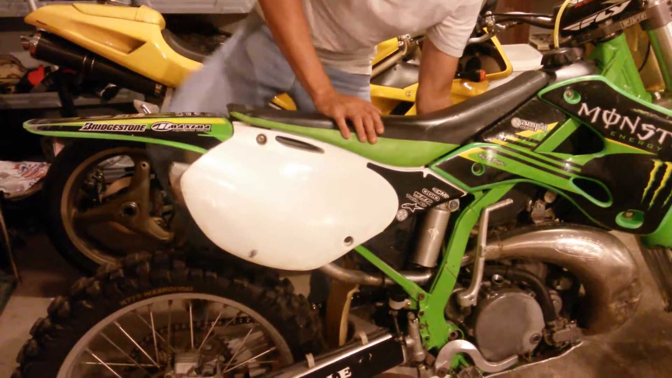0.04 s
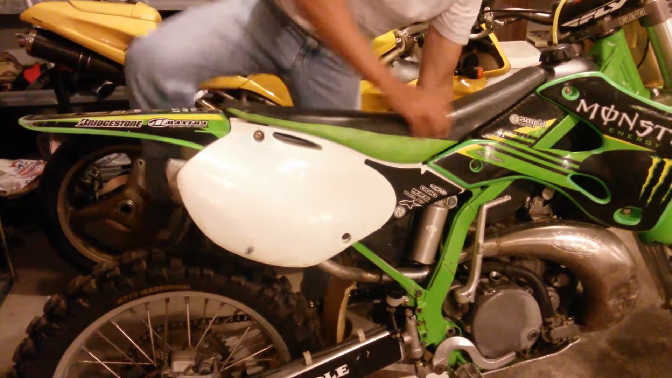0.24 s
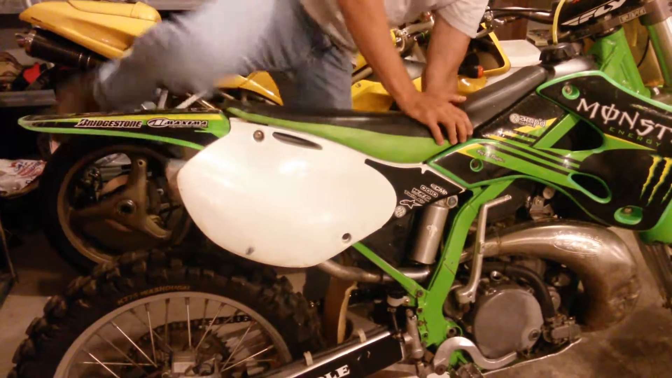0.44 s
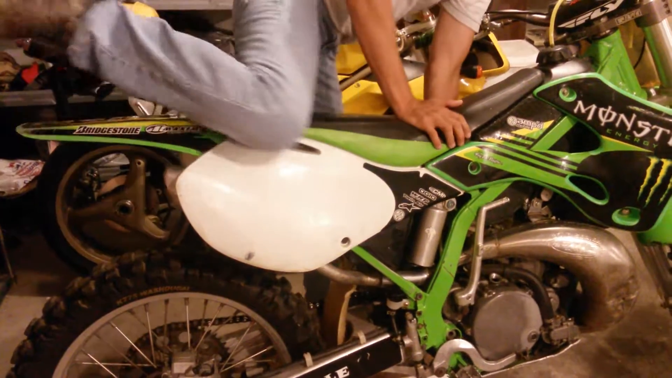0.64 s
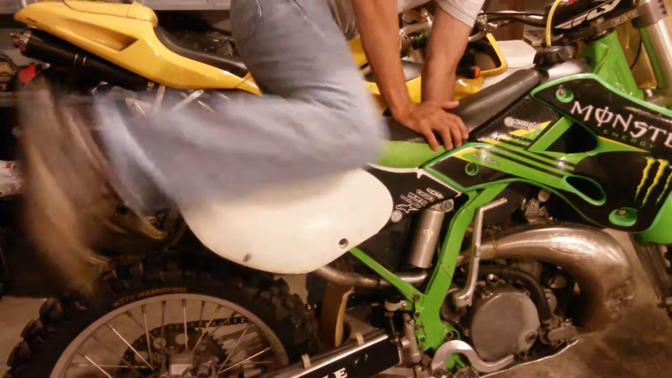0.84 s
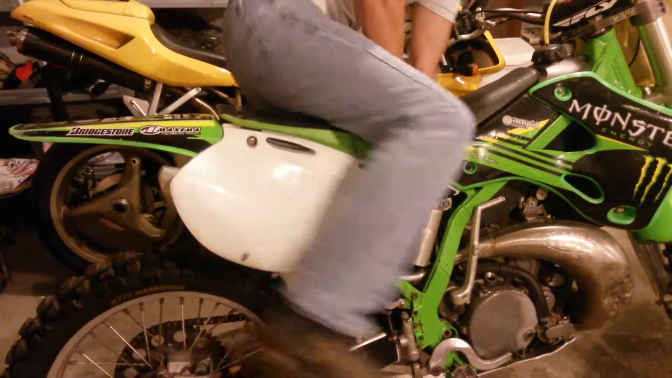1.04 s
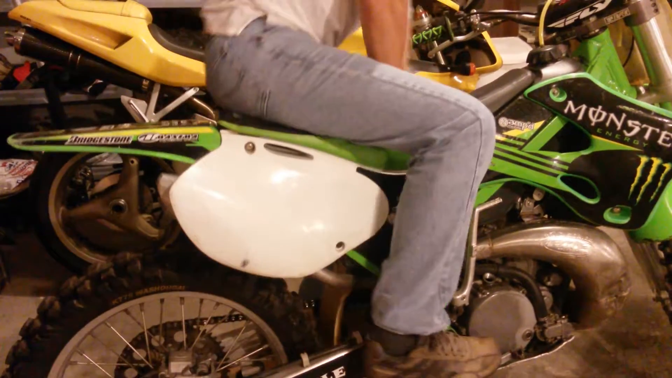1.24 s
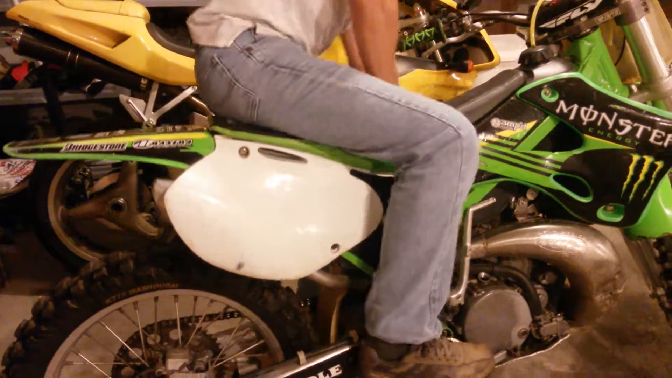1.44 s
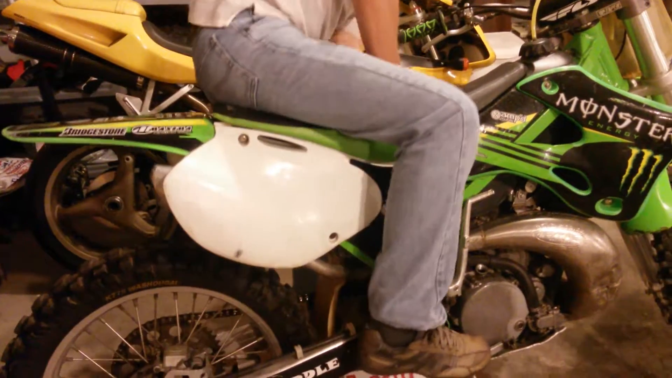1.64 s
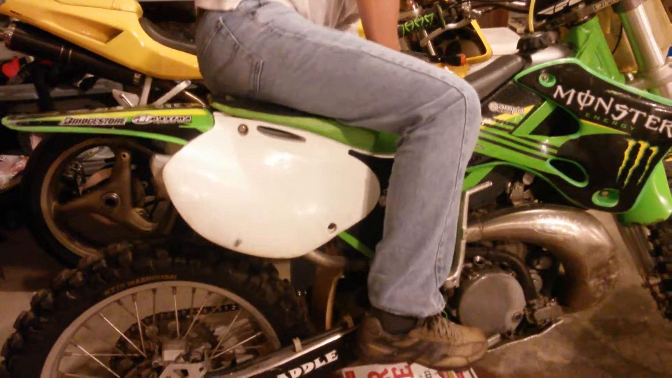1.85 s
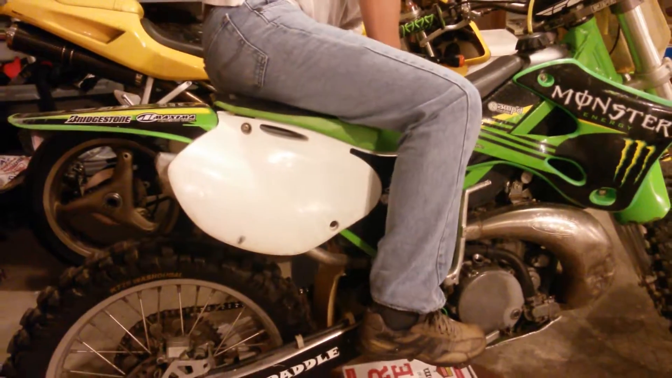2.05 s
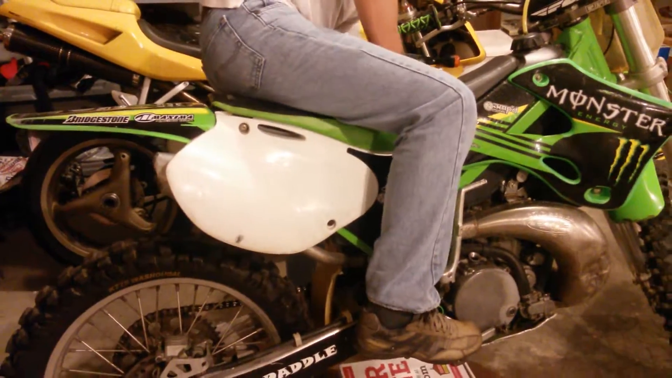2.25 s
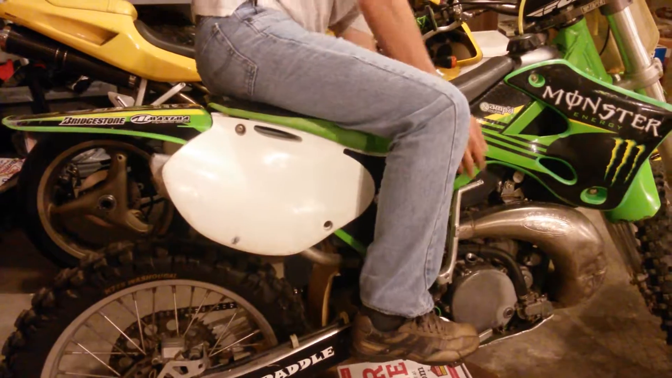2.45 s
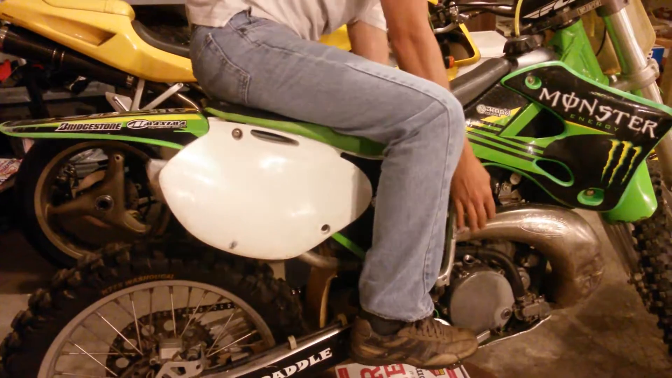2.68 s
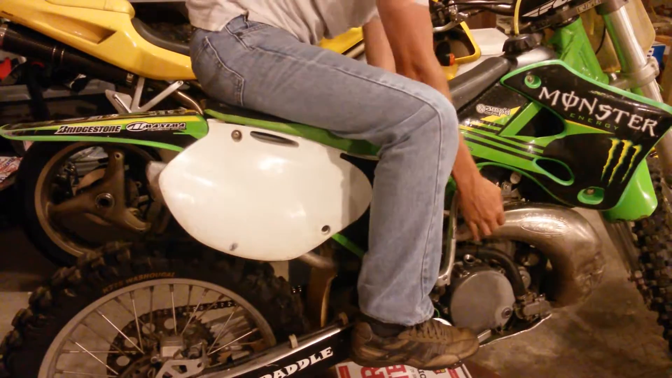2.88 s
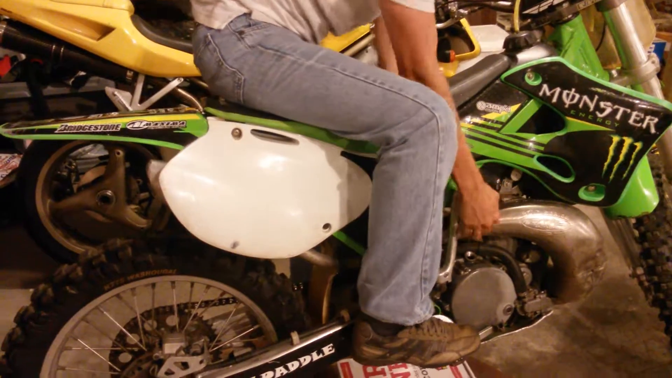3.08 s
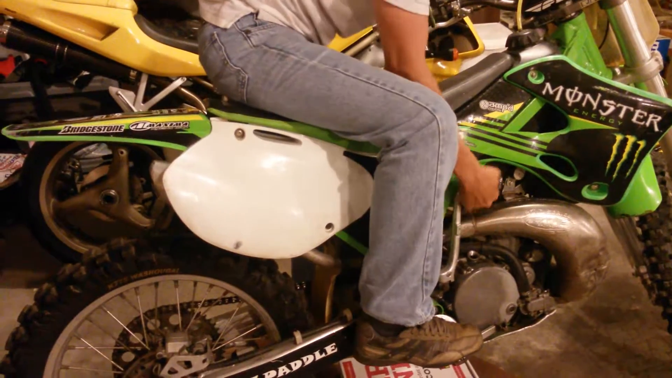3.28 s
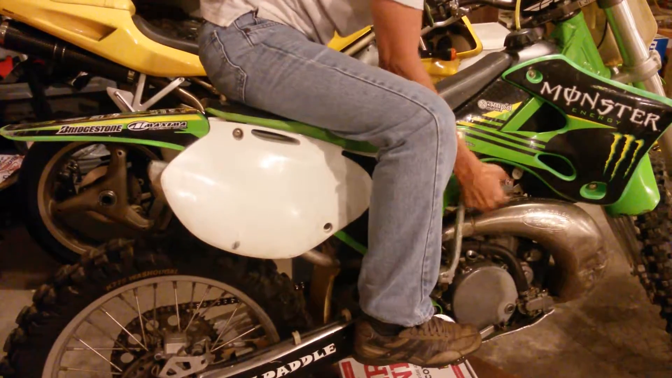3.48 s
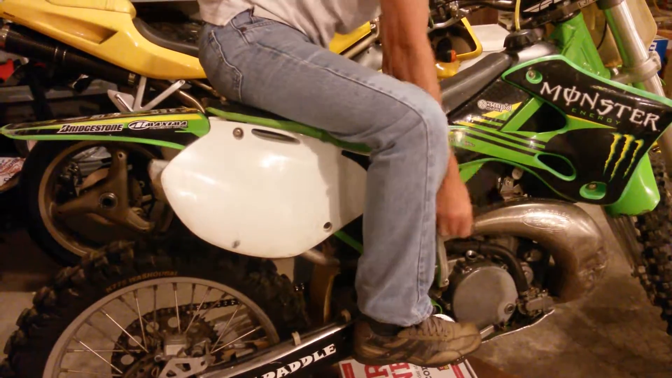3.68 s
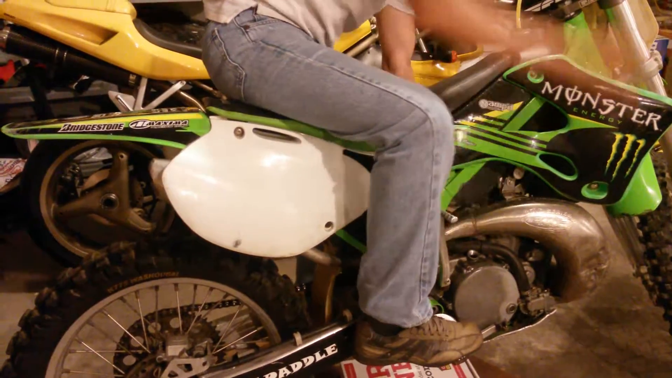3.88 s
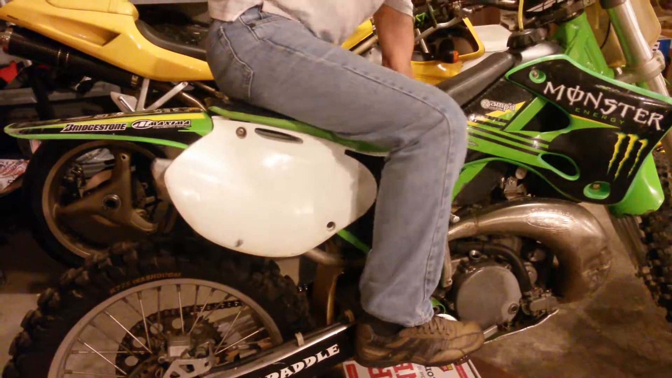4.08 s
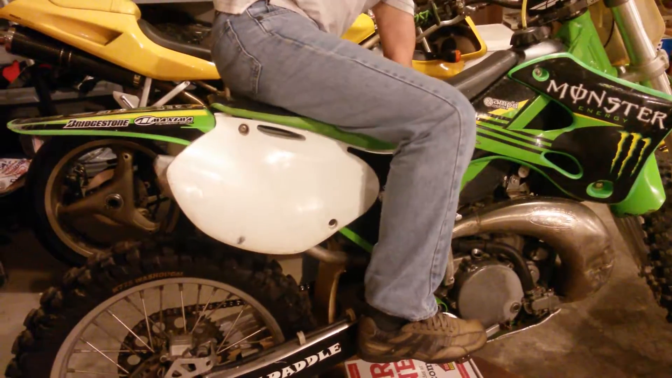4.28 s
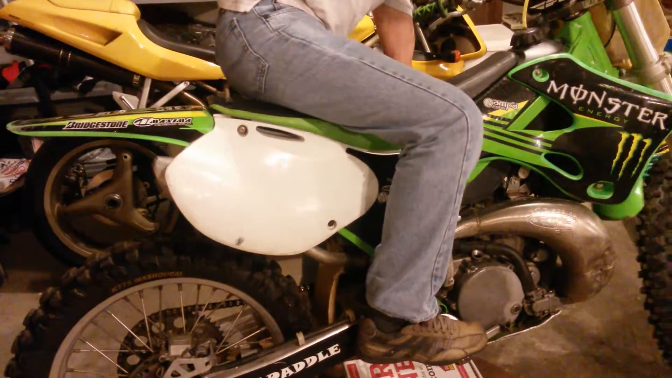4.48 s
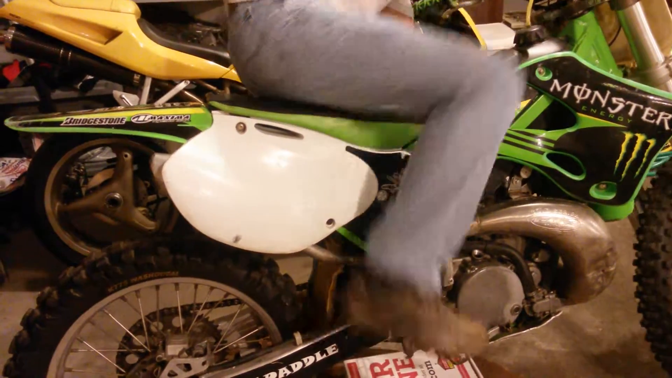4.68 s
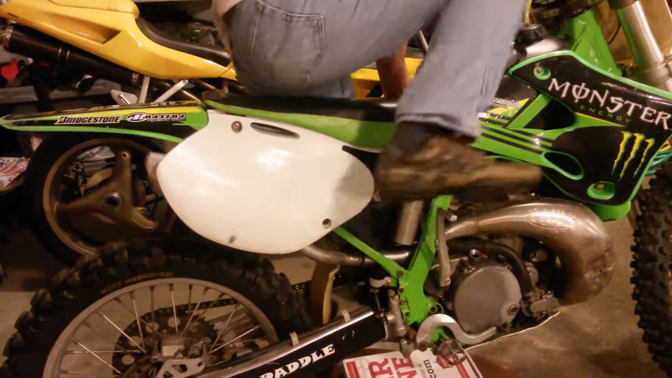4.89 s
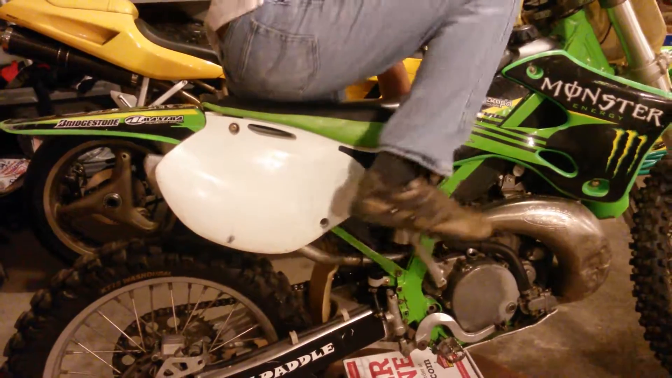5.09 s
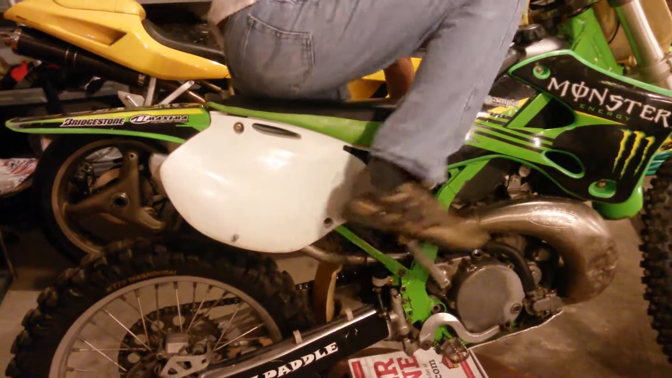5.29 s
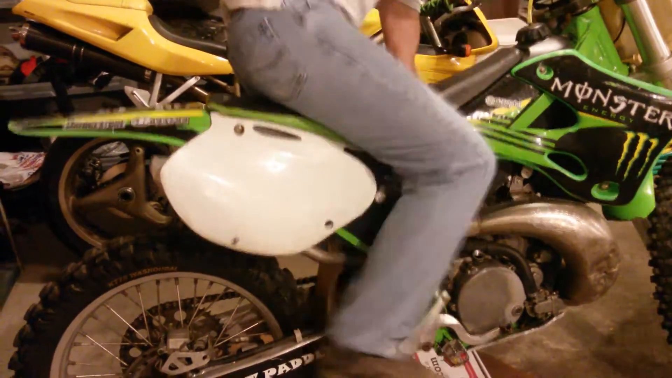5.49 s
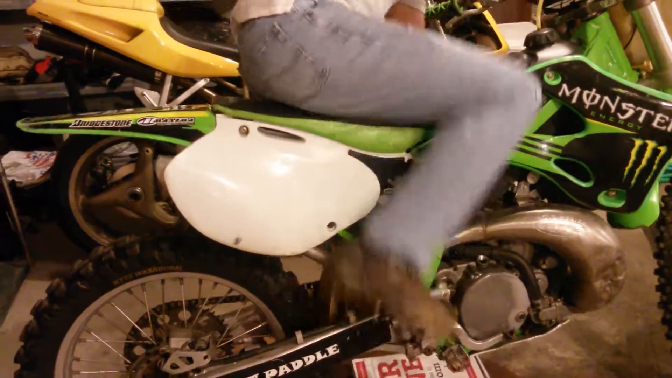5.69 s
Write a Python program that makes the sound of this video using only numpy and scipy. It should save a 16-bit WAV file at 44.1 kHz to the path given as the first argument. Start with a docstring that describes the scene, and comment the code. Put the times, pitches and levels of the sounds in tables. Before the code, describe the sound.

Soft clothing rubs, clicks and thuds on a dirt bike, ending in a single ratcheting kick-start stroke without the engine firing.

```python
"""Kicking a dirt bike in a small garage.

A rider climbs on, folds out the kick lever and stamps on it. Denim and rubber rustle as grainy
noise; boots, plastics and metal tick and thud as noise bursts through the bike's resonances, and
the seat or tank groans. The kick drives ratchet, gears, piston and pipe into a loud clatter, and
a metal part rings on at the end. Hard walls echo the bike over still air and humming lights."""
import sys
import numpy as np
from scipy import signal
from scipy.fft import rfft, irfft
from scipy.io import wavfile
from scipy.ndimage import uniform_filter1d

SR = 44100
rng = np.random.default_rng(int(sys.argv[2]) if len(sys.argv) > 2 else 0)


def transcribe(signal):
    """Save signal, clipped to [-1, 1], as a 16-bit WAV file at the path in sys.argv[1]."""
    frames = np.atleast_2d(signal).T
    limited = np.clip(frames, -1, 1)
    pcm = np.round(limited * 32767).astype(np.int16)
    wavfile.write(sys.argv[1], SR, pcm)


N = 252693
T = np.arange(N) / SR


def undb(db):
    return 10 ** (np.asarray(db) / 20)


def unit_rms(x):
    return x / np.sqrt(np.mean(x ** 2))


def wander(rate_hz):
    """Random levels joined by ramps; spread of order 1."""
    step = int(SR / rate_hz)
    return 1.72 * uniform_filter1d(np.repeat(rng.standard_normal(N // step + 1), step), step)[:N]


def panned(x, left_db):
    return x * undb([[left_db / 2], [-left_db / 2]])


def stereo_noise(alike):
    """White noise; left and right are equal at alike = 1."""
    mid, side = rng.standard_normal((2, N))
    return alike * mid + np.sqrt(1 - alike ** 2) * side * np.array([[1], [-1]])


def resonate(x, modes):
    """Steep resonances whose powers add; causal, and keeps the level of white noise."""
    n = 8192
    f = np.maximum(np.fft.rfftfreq(n, 1 / SR), 1)
    power = 0
    for hz, width_hz, db in modes:
        detune = (f / hz - hz / f) * hz / max(1.714 * width_hz, 20)
        power = power + undb(2 * db) / (1 + detune ** 2) ** 2
    cepstrum = irfft(np.log(power / power.mean()) / 2, n)
    cepstrum[1:n // 2] *= 2  # fold to minimum phase
    cepstrum[n // 2 + 1:] = 0
    response = irfft(np.exp(rfft(cepstrum)), n)[None, :n // 2]
    return signal.oaconvolve(x, response, axes=1)[:, :N]


def bursts(starts_s, levels_db, decays_ms, left_db, base_rise, alike):
    """Noise pushes that die exponentially; longer ones start more softly."""
    envelope = np.zeros(N)
    for start, db, decay_ms in np.broadcast(starts_s, levels_db, decays_ms):
        span = slice(int(start * SR), int((start + 0.15) * SR))
        age = np.maximum(T[span] - start, 0) * 1000 / decay_ms
        rise = base_rise + 0.038 * decay_ms  # share of the decay time
        envelope[span] += undb(db) * np.exp(-age) * (1 - np.exp(-age / rise))
    return panned(envelope, left_db) * stereo_noise(alike)


# Background spectrum. Each row: frequency in Hz, relative density in dB.
AIR_SPECTRUM = [(20, 4), (35, -8), (60, -16.5), (120, -12), (300, -16.5), (700, -21.5), (1500, -26),
                (4000, -28.5), (7800, -23), (11000, -29), (15000, -28)]
# Hum of the lights. Each row: frequency in Hz, level in dB.
LIGHT_HUM = [(60, -90), (120, -82), (601, -85)]


def air():
    """Still air, microphone hiss and the hum of the lights."""
    hz, density_db = np.transpose(AIR_SPECTRUM)
    f = np.maximum(np.fft.rfftfreq(N, 1 / SR), 1)
    spectrum = undb(np.interp(np.log(f), np.log(hz), density_db))
    mid, side = irfft(rfft(rng.standard_normal((2, N))) * spectrum, N)
    side = signal.sosfilt(signal.butter(1, 380, "high", fs=SR, output="sos"), side)
    noise = unit_rms(mid + 0.91 * side * np.array([[1], [-1]]))
    hum = sum(undb(db) * np.sin(2 * np.pi * pitch * T) for pitch, db in LIGHT_HUM)
    return noise * undb(-68.5 + 0.14 * wander(2.6)) + hum


# The rider's movements. Each row: time of full level, swell and hold in seconds,
# then treble, mid and bass levels in dB.
RUBS = [(0.086, 0.21, 0.16, -60.5, -71, -74.5), (0.322, 0.14, 0.12, -56.5, -67.5, -70),
        (0.512, 0.03, 0.13, -49, -55, -50.5), (0.775, 0.044, 0.1, -53, -53.5, -64),
        (1.18, 0.25, 0.15, -56, -66.5, -60.5), (1.25, 0.031, 0.17, -47, -54.5, -55),
        (1.665, 0.5, 0.034, -47, -60, -60), (1.87, 0.066, 0.016, -56, -69, -67),
        (2.008, 0.088, 0.071, -58, -76, -73), (2.969, 0.043, 0.025, -65, -72, -73),
        (3.134, 0.097, 0.028, -48.5, -58, -65.5), (3.394, 1, 0.25, -69, -74, -80.5),
        (3.738, 0.31, 0.096, -66.5, -66, -60.5), (4.201, 0.12, 0.093, -62.5, -66.5, -65),
        (4.412, 0.26, 0.17, -66.5, -74.5, -71.5), (4.658, 0.044, 0.05, -49, -56, -61.5),
        (4.767, 0.1, 0.14, -40.5, -53.5, -60.5), (5.021, 0.052, 0.034, -49, -50, -47),
        (5.133, 0.13, 0.066, -47.5, -59, -57)]


def rub_gains(swell_db=19, fade_db_per_s=130):
    """Treble, mid and bass gains of denim and rubber rubbing: each stroke swells, holds, fades."""
    power = 0
    for full_s, swell_s, hold_s, *bands_db in RUBS:
        rise_db = np.minimum(swell_db * (T - full_s) / swell_s, 0)
        fall_db = fade_db_per_s * np.maximum(T - full_s - hold_s, 0)
        power = power + undb(2 * (np.array(bands_db)[:, None] + rise_db - fall_db))
    return np.sqrt(power)


# Resonances, shared with thuds and ticks. Each row: centre in Hz, nominal width in Hz, weight in dB.
TREBLE_MODES = [(5530, 4740, -1), (7605, 1680, 11.5), (10800, 3700, -38.5)]  # bright colour near the microphone's peak
METAL_MODES = [(1450, 1100, 2.5), (2115, 500, 5), (2780, 1530, 3)]  # lever and frame
BODY_MODES = [(103, 66, -5.5), (246, 132, 4), (305, 157, 4), (480, 110, 4), (640, 350, -1.5), (816, 180, 0),
              (1110, 720, -3)]  # bike body and pipe


def friction(treble_gain, mid_gain, bass_gain):
    """Rubbing and whirring: dense, uneven, flickering grains excite three sets of resonances."""
    def grains(alike, left_db, flicker_db):
        size = undb(1.82 * rng.exponential(size=N) + flicker_db * wander(40))
        return unit_rms(panned(size * stereo_noise(alike), left_db))
    hiss = resonate(grains(alike=0.68, left_db=0.24, flicker_db=1.97), TREBLE_MODES)
    scrape = resonate(grains(alike=0.68, left_db=4.8, flicker_db=2.65), METAL_MODES)
    body = resonate(grains(alike=0.96, left_db=0.17, flicker_db=2.56), BODY_MODES)
    return hiss * treble_gain + scrape * mid_gain + body * bass_gain


# Blows on seat, tank and floor, and puffs of the pipe. Each row: start in seconds, level in dB,
# upper-mode offset in dB, favoured pitch in Hz.
THUDS = [(0.072, -50.5, -20, 637), (0.342, -45, -6, 218), (0.612, -32, -7, 437), (1.165, -41.5, -8.5, 485),
         (1.316, -35.5, -8, 457), (1.385, -42.5, -4, 290), (3.566, -48.5, -10.5, 553),
         (3.655, -46.5, 3, 360), (3.748, -28.5, -8.5, 418), (4.155, -45, -11, 280),
         (4.406, -43.5, -18, 530), (4.468, -58.5, 6.5, 610), (4.974, -40, -24, 300), (5.002, -30, -5, 280),
         (5.343, -24.5, 0.5, 310), (5.413, -15, -13, 198), (5.509, -14, -1, 367), (5.524, -21, 1.5, 306),
         (5.553, -11.5, -13, 260), (5.636, -18, -7, 464)]


def thuds():
    """Soft blows: the struck spot favours one body pitch; brighter blows also wake the upper modes."""
    starts_s, db, upper_db, pitches_hz = np.transpose(THUDS)
    blows = bursts(starts_s, db, decays_ms=9.6, left_db=0, base_rise=0.025, alike=1)
    edges = list((starts_s * SR).astype(int)) + [N]
    pitched = np.zeros((2, N))
    for start, end, hz in zip(edges, edges[1:], pitches_hz):
        spot = signal.iirpeak(hz, Q=1.6, fs=SR)
        pitched[:, start:end] = signal.lfilter(*spot, blows[:, start:end]) * np.sqrt(400 / hz)
    knocks = bursts(starts_s, db + upper_db, decays_ms=9.7, left_db=3.1, base_rise=0.022, alike=0.89)
    return resonate(pitched, BODY_MODES[1:5]) + resonate(knocks, BODY_MODES[5:])


# Ticks, clacks and scuffs of boot, lever and ratchet. Each row: start in seconds, crack level in dB,
# clank offset in dB, crack decay in ms.
TICKS = [(0.3054, -39.5, -8, 5.1), (0.5003, -31, -35, 7), (0.7561, -17, -8.5, 4.4),
         (1.317, -26.5, -19, 5.1), (1.382, -32, -8, 6.9), (1.4233, -30, -34, 4.3), (1.516, -35.5, -20, 8.3),
         (1.604, -24.5, -44, 8.1), (1.7131, -23, -40, 1.1), (1.847, -36.5, -15, 7.6),
         (1.985, -34.5, -29, 4.3), (2.0463, -31.5, -22, 2.3), (2.084, -39.5, -33, 11),
         (2.413, -49, -10.5, 5.4), (2.593, -45, -19.5, 5.4), (2.9575, -56, -6, 5.4), (3.07, -37, -24, 7.7),
         (3.09, -29.5, -18, 8.7), (3.132, -40, -9, 3.3), (3.656, -47.5, 3, 3.6), (3.75, -50, 13.5, 1.6),
         (4.1444, -52.5, 6.5, 8.3), (4.215, -40.5, -14.5, 8.2), (4.6737, -30.5, -11.5, 9.9),
         (4.718, -27.5, -21, 3.3), (4.7496, -24.5, -28, 5.7), (4.869, -27, -23, 8), (4.9152, -33, -23, 5),
         (5.004, -31.5, -2, 11.4), (5.0535, -17.5, -7.5, 3), (5.079, -27, -21, 2.4), (5.333, -31, 4.5, 7.3),
         (5.401, -10.5, -17.5, 6.6), (5.509, -15.5, -7.5, 5.2), (5.534, -6.5, -30, 9.7),
         (5.5791, -10.5, -7, 4.5), (5.588, -7.5, -22, 3.2), (5.612, -7.5, -14, 7.2),
         (5.6505, -7.5, -16.5, 4), (5.664, -5.5, -12, 4.4), (5.671, -5.5, -10.5, 7.5)]


def ticks():
    """Each contact cracks in the treble and clanks longer in the metal parts, further to the left."""
    starts_s, db, clank_db, decays_ms = np.transpose(TICKS)
    crack = bursts(starts_s, db, decays_ms, left_db=0.93, base_rise=0.049, alike=0.65)
    crack = signal.lfilter(*signal.butter(2, 10500, fs=SR), resonate(crack, TREBLE_MODES))
    clank = bursts(starts_s, db + clank_db, 1.47 * decays_ms, left_db=4.2, base_rise=0.01, alike=0.76)
    return crack + resonate(clank, METAL_MODES)


# Tones of struck parts. Each row: start in seconds, pitch in Hz, level in dB, T60 in seconds.
RINGS = [(0.7565, 900, -23, 0.034), (0.7565, 1990, -22, 0.026), (5.681, 5125, -20.5, 0.41),
         (0.76, 2360, -34, 0.05), (0.76, 1520, -36, 0.06), (0.61, 1120, -47, 0.09), (3.749, 850, -40, 0.05),
         (3.7485, 430, -27, 0.035), (5.416, 215, -16, 0.06), (5.555, 220, -22, 0.07),
         (5.51, 900, -25, 0.08), (5.616, 3420, -21, 0.035), (5.672, 2240, -25, 0.15)]


def ringing_parts(attack_s=0.0011, flicker_db=0.92):
    """Metal parts and the pipe ring on as damped sines after clacks and the kick."""
    tones = 0
    for start_s, hz, db, t60_s in RINGS:
        age_s = np.maximum(T - start_s, 0)
        decay = undb(db - 60 * age_s / t60_s + flicker_db * wander(120))
        attack = np.clip(age_s / attack_s, 0, 1)
        tones = tones + attack * decay * np.sin(2 * np.pi * hz * age_s)
    return panned(tones, left_db=2)


# Groan envelope. Each row: time in seconds, level in dB.
GROAN_LEVELS = [(3.16, -74), (3.235, -55.5), (3.265, -63), (3.315, -56), (3.37, -62), (3.41, -88),
                (3.44, -69), (3.47, -107)]


def seat_groan(jerks_per_s=260):
    """Seat or tank sticks and slips under the rider's weight; the jerks ring two low resonances."""
    times_s, db = np.transpose(GROAN_LEVELS)
    jerks = (rng.random((1, N)) < jerks_per_s / SR) * rng.standard_normal((1, N))
    creak = unit_rms(resonate(jerks, [(230, 19.5, -0.5), (400, 200, -20)]))
    return creak * undb(np.interp(T, times_s, db, left=-150, right=-150))


# Deep frame resonance. Each row: centre in Hz, nominal width in Hz, weight in dB.
RUMBLE_MODES = [(80, 55, 0)]
# Rumble envelope. Each row: time in seconds, level in dB.
RUMBLE_LEVELS = [(5.329, -62), (5.36, -60), (5.43, -47), (5.57, -49), (5.64, -58)]


def frame_rumble():
    """The frame shakes while the lever goes down."""
    times_s, db = np.transpose(RUMBLE_LEVELS)
    shake = resonate(stereo_noise(alike=0.99), RUMBLE_MODES)
    return shake * undb(np.interp(T, times_s, db, left=-150, right=-150))


def ratchet_gain(teeth_per_s=139.9, max_jump_db=12):
    """Gain that jumps as each tooth slips, at an uneven pace, and sags until the next."""
    teeth_passed = np.cumsum(teeth_per_s * (1 + 0.3 * wander(90))) / SR
    jump_db = max_jump_db * rng.random(N // 50)[teeth_passed.astype(int)]
    return unit_rms(undb(jump_db * np.exp(-(teeth_passed % 1) / 0.3)))


# Whirr of gears and piston. Each row: time in seconds, then treble, mid and bass levels in dB.
KICK_LEVELS = [(5.335, -79, -50, -34), (5.36, -56, -40, -46), (5.39, -48, -57, -34.5),
               (5.43, -29, -38.5, -28), (5.48, -31, -32.5, -27.5), (5.52, -38, -41.5, -32.5),
               (5.57, -25.5, -31, -28), (5.6, -45, -39, -32.5), (5.64, -31, -30, -38.5),
               (5.69, -23.5, -27.5, -35), (5.73, -24.5, -30, -40)]


def kick_gains():
    """Treble, mid and bass gains as the kick turns the engine over; the ratchet chops the upper two."""
    times_s, *bands_db = np.transpose(KICK_LEVELS)
    treble, mids, bass = (undb(np.interp(T, times_s, db, left=-150)) for db in bands_db)
    chop = ratchet_gain()
    return np.array([treble * chop, mids * chop, bass])


# Garage reverberation. Each row: band centre in Hz, T60 in seconds, echo level in dB.
ECHO_BANDS = [(150, 0.34, -6.5), (520, 0.39, -6.5), (1620, 0.43, -5.5), (3930, 0.45, -3),
              (9270, 0.25, -8.5), (13100, 0.099, -4)]


def garage_echo(x, delay_s=0.004, build_s=0.0028):
    """Hard walls return a noise tail in overlapping bands, each fading at its own rate."""
    t = np.arange(SR) / SR
    log_hz = np.log(np.maximum(np.fft.rfftfreq(SR, 1 / SR), 1))
    log_centres = np.log([row[0] for row in ECHO_BANDS])
    tail = 0
    for k, (hz, t60_s, echo_db) in enumerate(ECHO_BANDS):
        share = np.sqrt(np.interp(log_hz, log_centres, np.arange(len(ECHO_BANDS)) == k))
        band = irfft(rfft(rng.standard_normal((2, SR))) * share, SR)
        band[1] += max(1 - hz / 1500, 0) * (band[0] - band[1])  # bass is alike left and right
        fade = undb(-60 * t / t60_s) * np.clip((t - delay_s) / build_s, 0, 1)
        tail = tail + undb(echo_db) * band * fade / np.sqrt(np.sum(fade ** 2))
    return signal.fftconvolve(x, tail, axes=1)[:, :N]


def scene():
    """Rider and bike with their echo, over dry frame rumble and air."""
    impacts = ticks() + thuds()
    friction_gains = np.hypot(rub_gains(), kick_gains())  # powers add
    bike = impacts + friction(*friction_gains) + ringing_parts() + seat_groan()
    return bike + garage_echo(bike) + frame_rumble() + air()


def record(dry):
    """The deepest bass is lost, peaks are rounded, and the treble stops steeply at 14.6 kHz."""
    bass_cut = signal.butter(2, 45, "high", fs=SR)
    treble_cut = signal.ellip(8, 0.2, 70, 14600, fs=SR, output="sos")
    return signal.sosfilt(treble_cut, np.tanh(signal.lfilter(*bass_cut, dry)))


dry = scene()
out = record(dry)
transcribe(out)
```